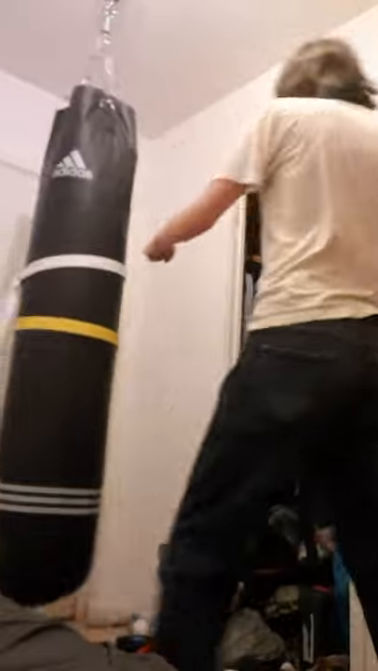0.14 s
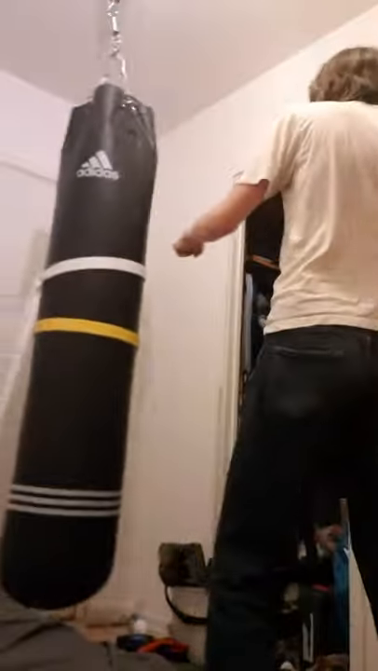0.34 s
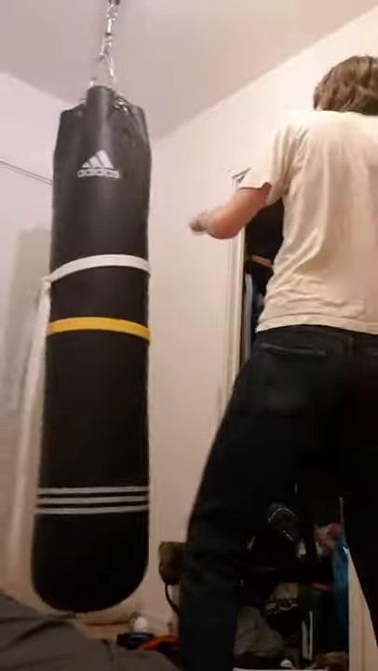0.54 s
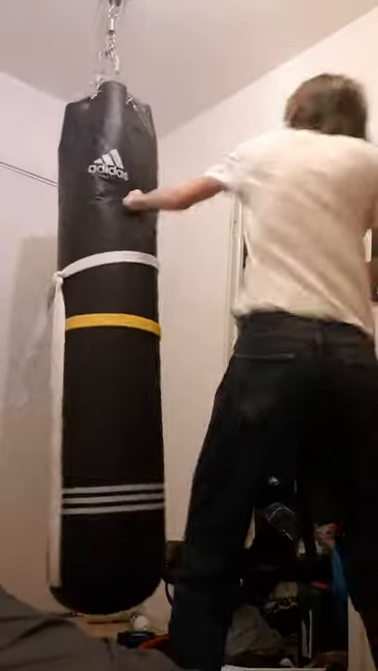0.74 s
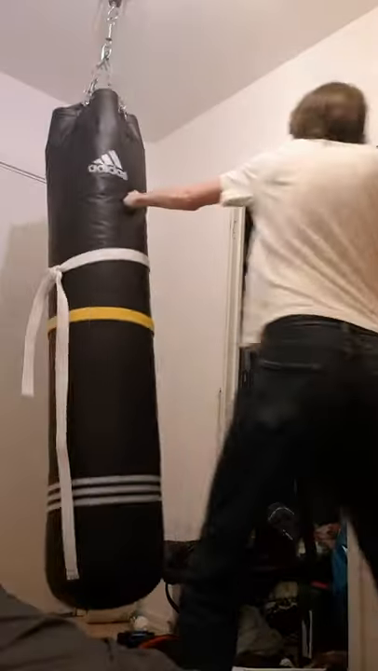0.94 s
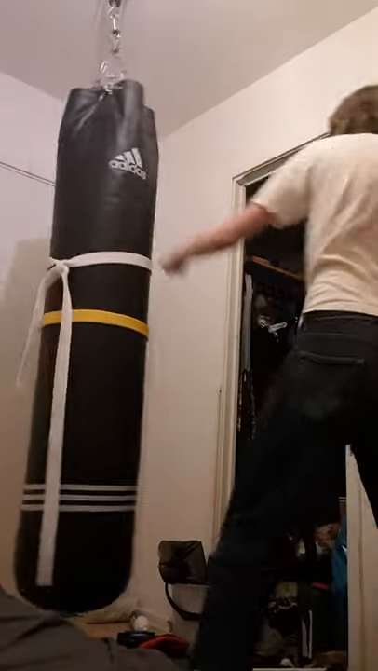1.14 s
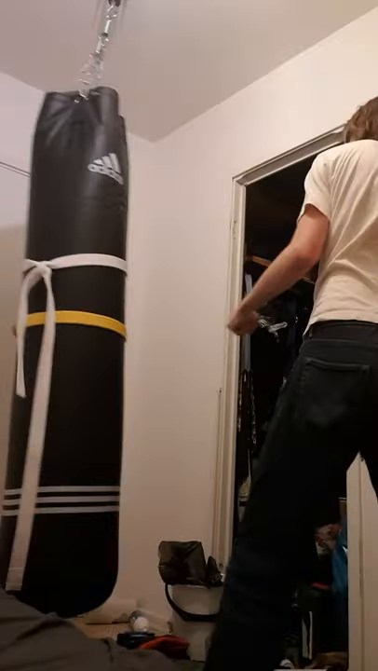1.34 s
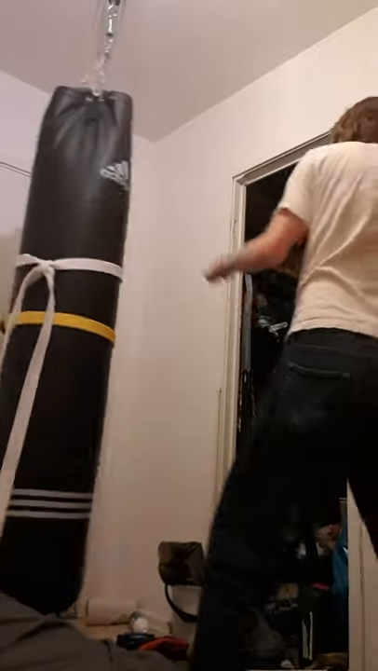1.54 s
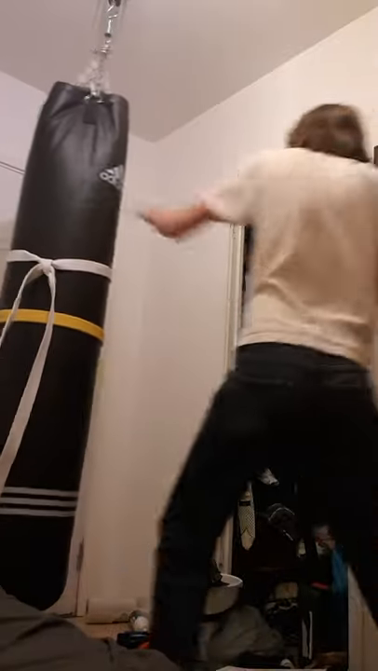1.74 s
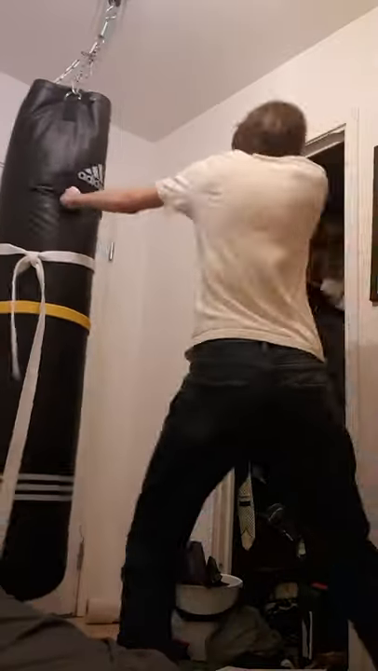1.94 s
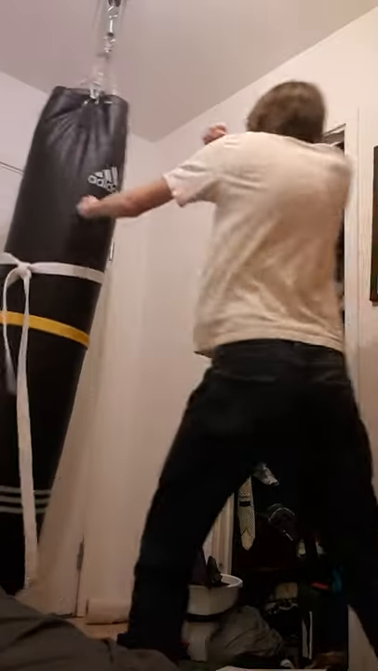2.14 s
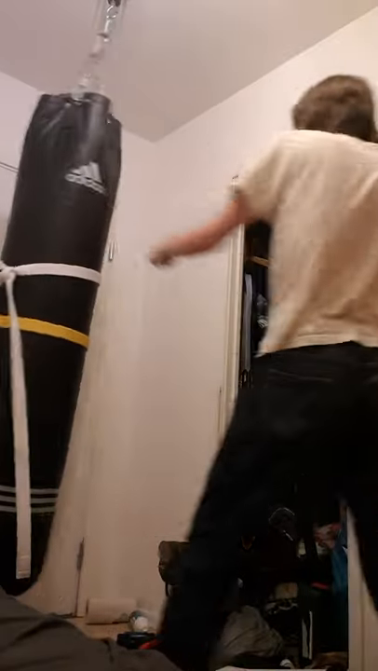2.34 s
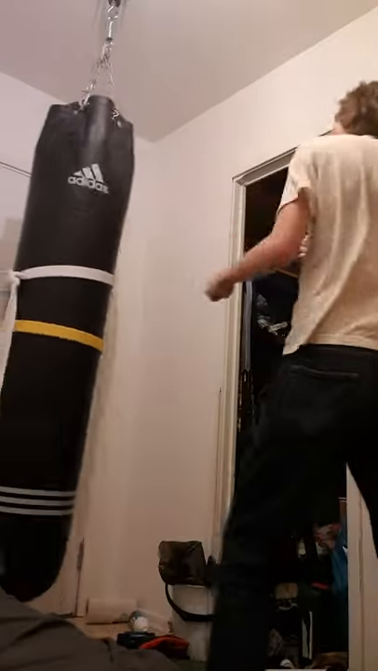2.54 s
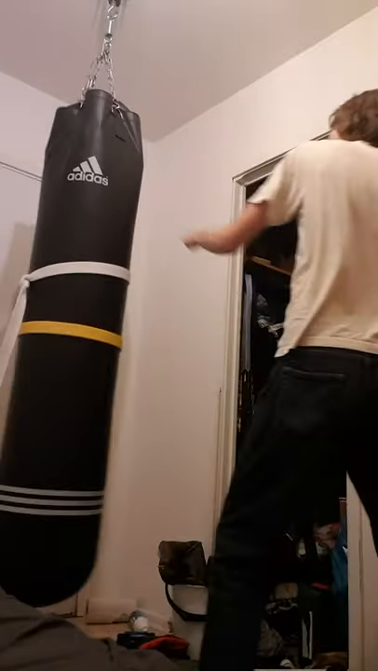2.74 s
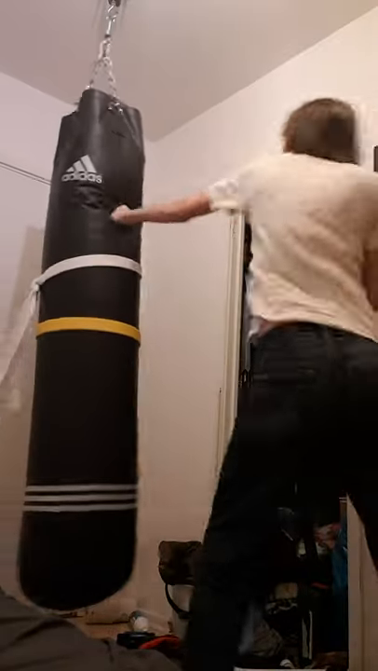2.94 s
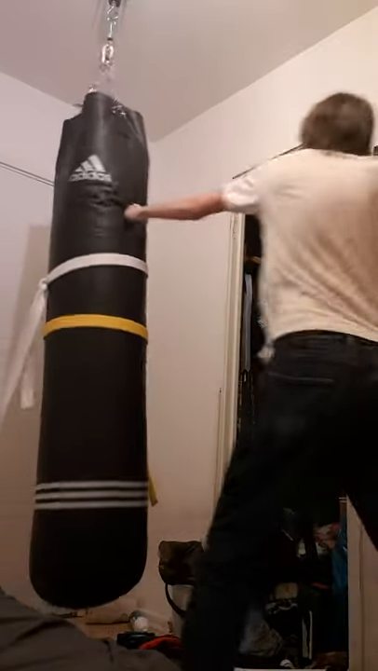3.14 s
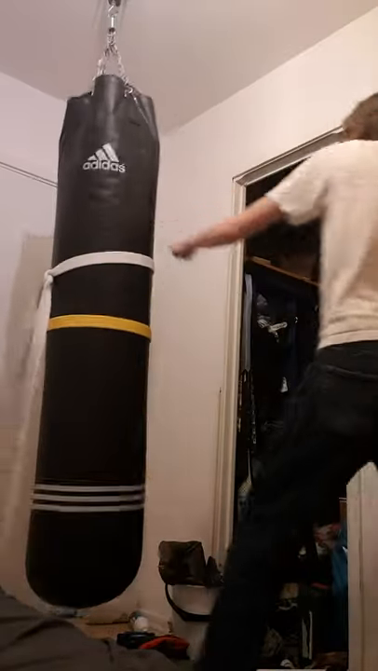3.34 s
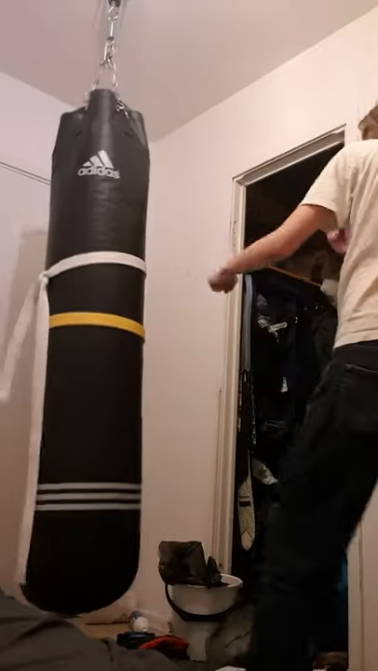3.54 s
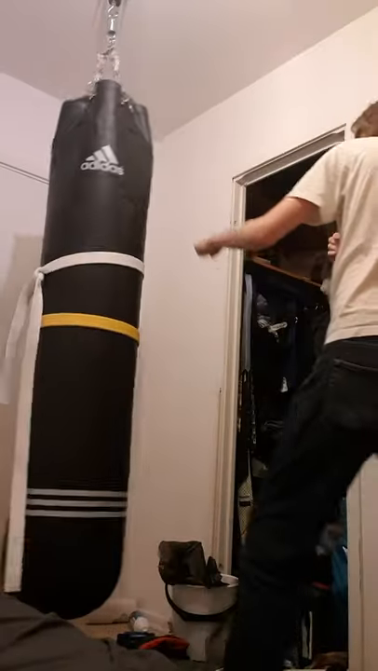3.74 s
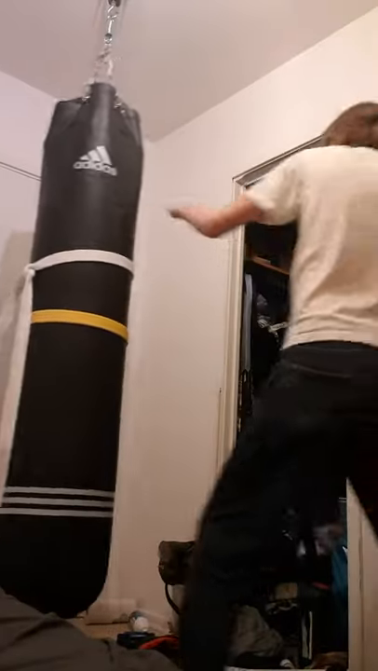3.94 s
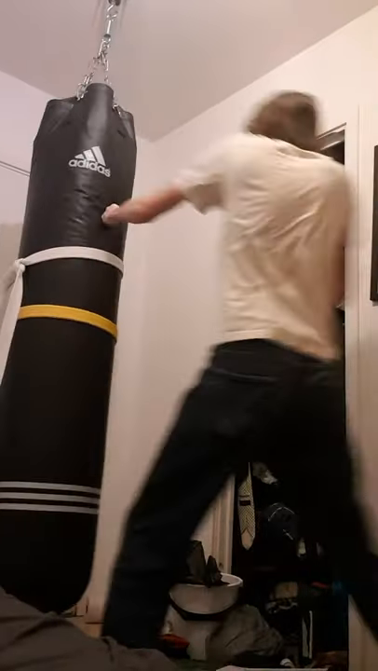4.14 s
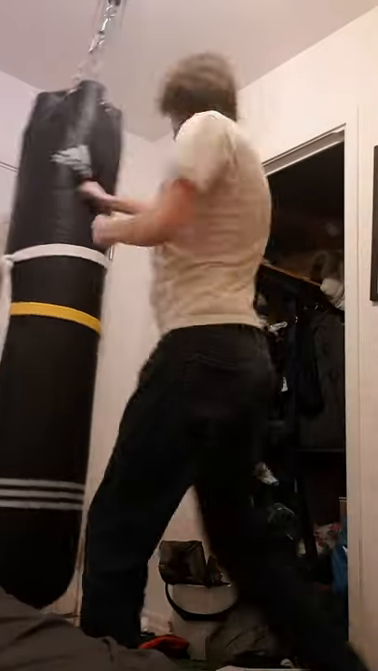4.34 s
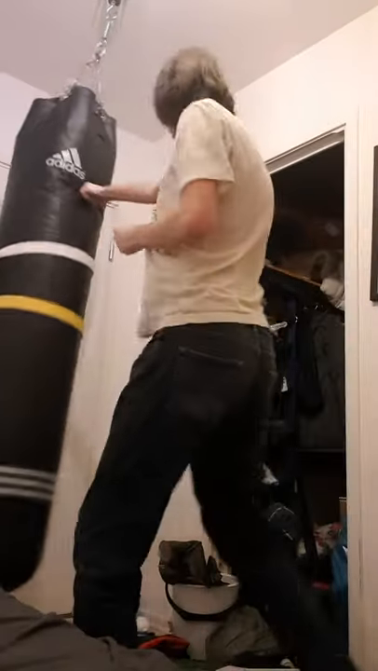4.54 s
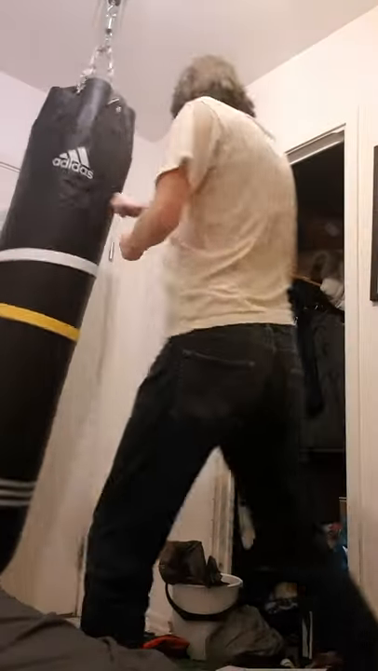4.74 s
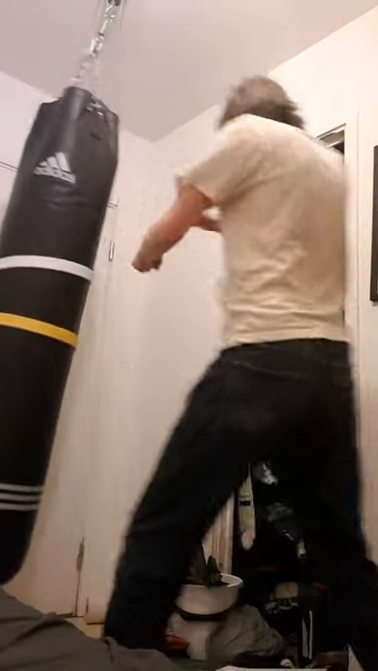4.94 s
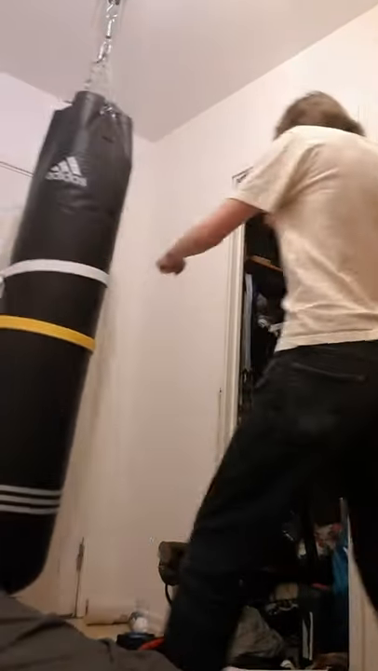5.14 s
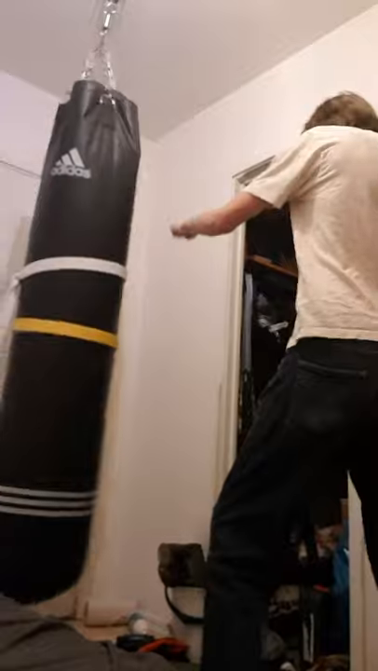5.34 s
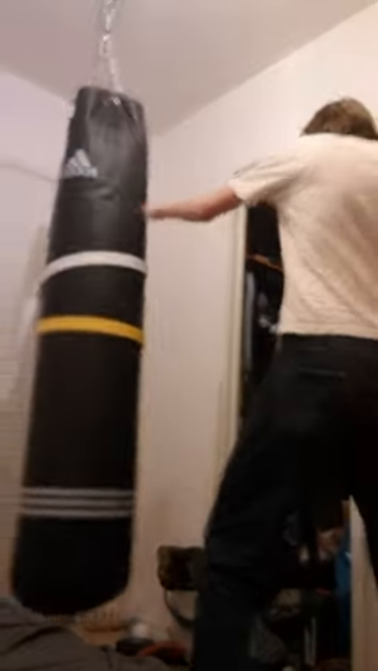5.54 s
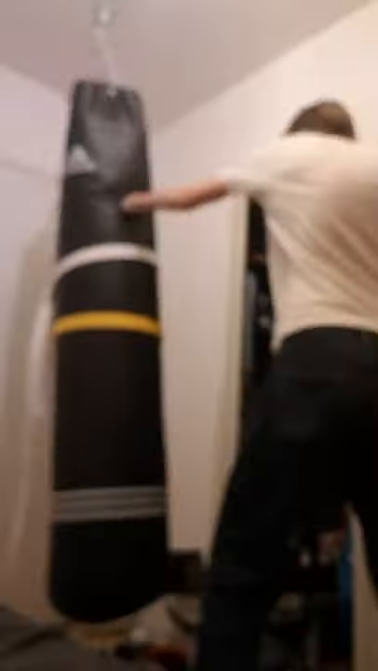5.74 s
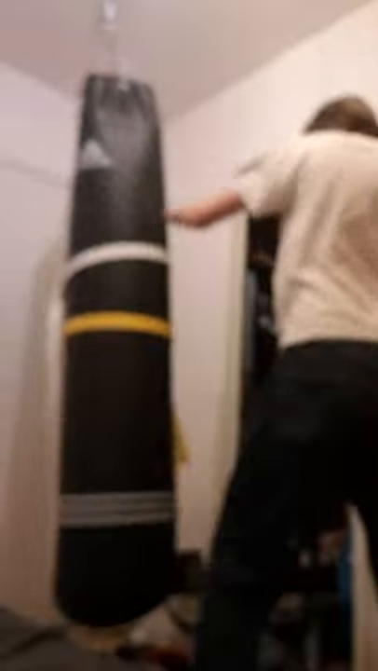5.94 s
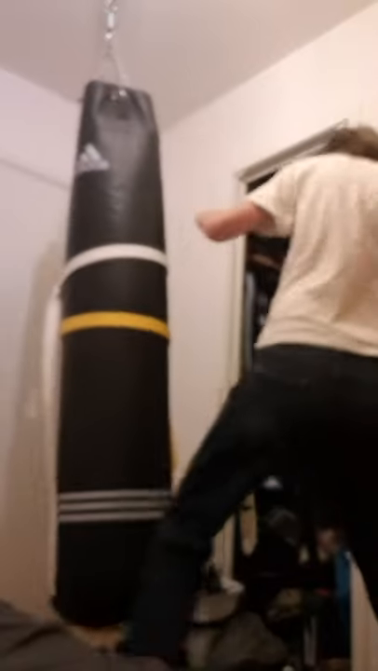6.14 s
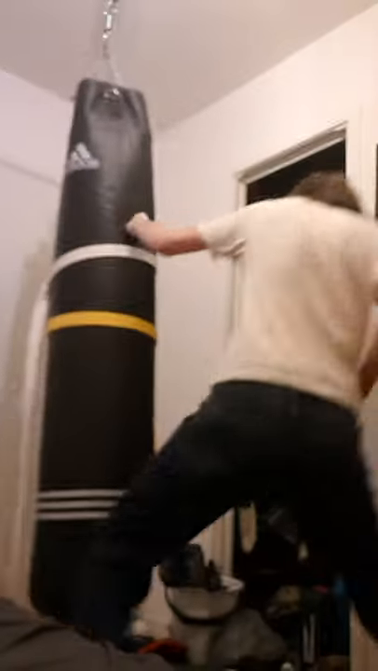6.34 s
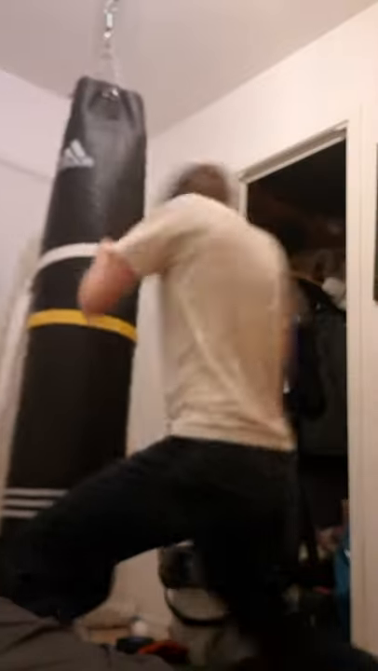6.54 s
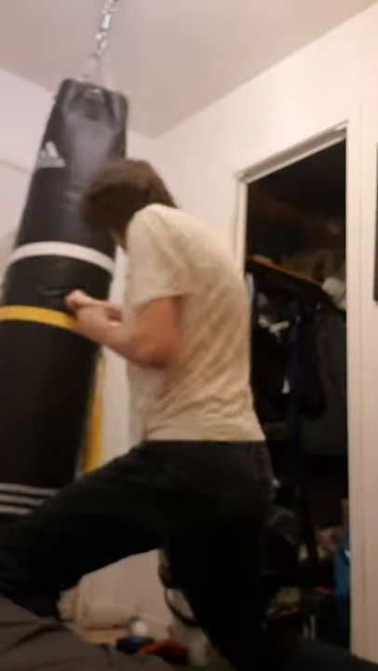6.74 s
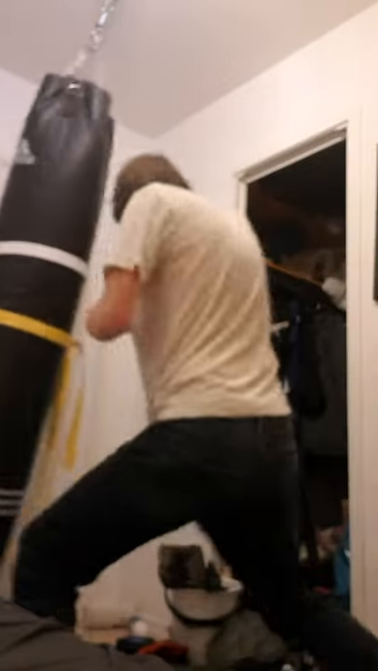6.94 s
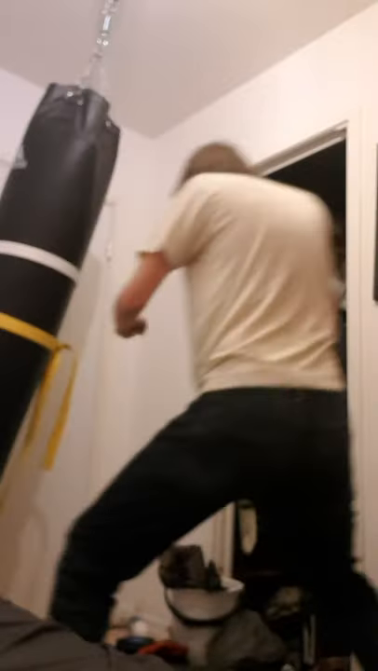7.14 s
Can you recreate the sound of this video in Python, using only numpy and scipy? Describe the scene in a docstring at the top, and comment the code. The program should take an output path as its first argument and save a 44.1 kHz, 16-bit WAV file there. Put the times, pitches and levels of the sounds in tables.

```python
"""Low noise and a creak come first, then a dull thump and the clink of a loose chain; fists soon hit a heavy bag.
Links are made of short noise bursts, ringing tones and tiny random contacts as the bag sways.
Punches are an inward pulse plus a noisy slap; thumps are soft noise, and both set low room tones booming.
Fading echoes make the small room, and a pair of microphones hears it, the right one shaded and duller."""
import sys
import numpy as np
from scipy import signal
from scipy.fft import rfft, irfft
from scipy.io import wavfile
from scipy.ndimage import uniform_filter1d

SR = 44100
rng = np.random.default_rng(int(sys.argv[2]) if len(sys.argv) > 2 else 0)


def dump(signal):
    """Clip the signal to [-1, 1] and save it as 16-bit WAV at the path in sys.argv[1]."""
    limited = np.clip(np.atleast_2d(signal).T, -1, 1)
    pcm = np.round(limited * 32767).astype(np.int16)
    wavfile.write(sys.argv[1], SR, pcm)


N = 316638

# All source levels in these tables are relative: each sound adds its own offset.
# steady background noise: [pitch_hz, level_db]
FLOOR_NOISE = [(15, -35), (25, -46), (78, 32.5), (170, -13), (229, 3), (545, -33), (1190, 7.5),
               (2410, -5.5), (4250, -13), (8830, -13), (10400, -80), (14400, -69), (16000, -39)]
# how hard the bag sways: [start_s, creak_db, chain_rattle_db]
SWAY = [(0.0, -40, -47), (0.12, -47, -46), (0.6, -55, -54.5), (0.8, -57.5, -57), (0.98, -40, -48),
        (1.26, -49.5, -56.5), (1.4, -52, -66), (1.62, -52, -51), (2.16, -53.5, -55), (2.58, -50, -46.5),
        (2.82, -55.5, -85), (3.02, -56, -50), (3.14, -47, -48), (3.54, -47.5, -51), (3.94, -56.5, -71),
        (4.14, -48, -55), (4.3, -52.5, -55.5), (4.56, -50.5, -60), (4.86, -46, -39.5), (5.22, -49.5, -58),
        (5.76, -53, -58), (6.06, -54, -55), (6.64, -55.5, -59), (7.18, -54, -54)]
# low tones of room and ceiling: [pitch_hz, level_db, time_to_fall_60_db_s]
BOOM_MODES = [(28.7, -56, 0.15), (52.1, -3.5, 0.6), (80.1, -2.5, 0.39), (93.1, -9.5, 0.34), (99, -7, 0.2)]
# thumps of feet and ceiling mount: [start_s, boom_db, knock_db, boom_tilt_db_per_octave]
THUMPS = [(0.02, -47, -33.5, 3), (0.13, -30.5, -40, 5.5), (0.206, -29.5, -27.5, -2),
          (0.498, -56, -42.5, -4), (0.849, -31, -37.5, 1), (0.934, -21.5, -36, 1), (0.984, -23.5, -38, -1),
          (1.037, -25, -39, -1), (1.068, -23, -32.5, -10), (1.166, -30.5, -36, 4), (1.246, -30, -39.5, -1),
          (1.376, -38, -43, 8), (1.659, -37, -40.5, 10), (1.988, -31, -43, -5), (2.126, -46, -41, -1),
          (2.248, -31, -37, 7), (2.286, -45, -43.5, -1), (2.412, -46, -40, 3), (2.458, -48, -38.5, 0),
          (2.511, -23, -37.5, -5), (2.574, -36, -45, 4), (2.682, -28, -39.5, 1), (2.743, -46, -45, 3),
          (3.288, -42, -39.5, 3), (3.384, -24, -39.5, -2), (3.447, -40, -33.5, -3), (3.499, -31, -37, -1),
          (3.77, -39, -40, -4), (4.025, -34, -41, -1), (4.169, -34, -38.5, 2), (4.522, -33, -39.5, 7),
          (4.7, -37, -43.5, 3), (4.792, -27.5, -37.5, 6.5), (4.894, -29.5, -33, 8), (5.209, -45, -43.5, 5),
          (5.51, -34, -41, 3), (5.929, -49, -43.5, 11), (6.208, -48, -44.5, 1), (6.297, -43, -48.5, 3),
          (6.513, -40.5, -43.5, 7), (7.008, -61, -44.5, 3)]
# chain clinks: [start_s, clank_db, clank_hz, tinkle_minus_clank_db, low_scrape_minus_clank_db]
CLINKS = [(0.0308, -42, 4230, 0.5, -4), (0.14, -45.5, 2800, -1.5, -15), (0.167, -31.5, 4330, -17, -27),
          (0.2088, -20, 4450, -12.5, -18), (0.5564, -28, 4270, -21, -19.5), (0.8865, -26.5, 4200, -8, -29),
          (0.9444, -47, 4400, 3, -17), (0.9672, -33, 4300, -8, -26), (1.012, -33, 2820, -4.5, -2.5),
          (1.045, -30, 4470, -3, -22), (1.074, -52, 3700, 8, -8), (1.1284, -42, 4950, 5, -4.5),
          (1.1982, -34, 4600, -12, -12), (1.241, -34.5, 3350, -5, -15), (1.3362, -38.5, 4340, -8, -2),
          (1.3784, -41.5, 2920, -4.5, 1), (1.5948, -39.5, 4670, -1.5, -2), (1.7997, -67, 4960, -23, -17),
          (1.935, -23.5, 3860, -16, -10.5), (1.9764, -43, 3770, -10, -11), (2.0044, -34, 3930, -10, -12),
          (2.1293, -46, 3700, -12, -20.5), (2.146, -34, 4130, -15.5, -15), (2.1996, -39, 4400, 1.5, -5.5),
          (2.253, -51, 3850, 3, -11), (2.2967, -28.5, 3030, -6, -13.5), (2.3176, -34, 3180, -10, -14),
          (2.4503, -38.5, 4300, -8, -6), (2.5145, -51, 4250, -3, -12), (2.547, -40, 2940, -9, -10),
          (2.5986, -42, 3760, -4.5, -12), (2.6857, -48, 4930, -0.5, -16), (2.7511, -44, 4350, 0.5, -6),
          (2.798, -47, 3430, -30, -13), (3.0853, -30.5, 4350, -8, -10), (3.1464, -57, 4260, -11, -14),
          (3.2224, -43, 3900, -1, -7), (3.3053, -28.5, 4570, -13, -19), (3.348, -35.5, 4160, 2, -5),
          (3.4158, -37.5, 4370, -2, -8), (3.4525, -23, 3260, -19, -17), (3.5078, -27, 4430, -13.5, -16),
          (3.5913, -42, 3360, -5, -6), (3.681, -43, 3920, -3.5, -12), (3.7702, -37, 3770, -9, -10),
          (3.8383, -35.5, 3540, -9, -10), (4.4649, -26, 4400, -15, -22), (4.5547, -34, 4100, -9, -19),
          (4.5912, -35.5, 2710, -4.5, -6.5), (4.6106, -28.5, 4240, -10, -14.5),
          (4.7368, -34, 4080, -0.5, -10), (4.804, -33.5, 4850, -4, -13), (4.8453, -34.5, 3430, -8, -25),
          (4.9132, -37, 3460, 4, -2), (4.9878, -40, 4240, -18, -0.5), (5.0575, -46, 4970, 1.5, -1),
          (5.154, -38.5, 3690, -8.5, -20), (5.253, -49, 3050, -2, -8), (5.288, -43.5, 3200, -5, 0),
          (5.3523, -45, 4080, 4, -6), (5.3658, -39, 5130, -15, -9.5), (5.4304, -41.5, 4330, -5, -21),
          (5.447, -43, 4500, -9, -22), (5.5798, -35.5, 4240, -21, -21), (5.69, -32.5, 4470, -7, -8.5),
          (5.855, -48.5, 4530, -8, -21), (5.8895, -50, 4270, -25, -27), (5.924, -39.5, 3040, -29, 0),
          (5.9987, -41, 4580, -16, -5), (6.062, -47, 4170, 2, -15), (6.1795, -46, 4400, -9.5, -3.5),
          (6.2731, -46.5, 4570, -24, -20), (6.4124, -39.5, 4400, -5.5, -13), (6.5194, -55.5, 3340, 0, 6),
          (6.7948, -37.5, 3400, -3, -2), (7.0034, -29.5, 3750, -12, -14)]
# ringing tones shared by the links: [pitch_hz, width_hz, level_db]
LINK_MODES = [(3350, 66, -1), (4560, 170, -14.5), (6700, 33, -12), (10170, 190, 8.5), (11580, 170, 6.5),
              (13600, 88, 7), (14000, 160, -18.5), (14700, 98, 3)]
# moments when one link rings out: [start_s, link_name, level_db]
LINK_NOTES = [(.14, "m", -50), (.557, "h", -47.5), (.558, "k", -50), (.559, "d", -42), (.883, "i", -39),
              (.884, "l", -35), (.887, "g", -38), (.97, "g", -50), (1.048, "j", -38.5), (1.129, "m", -52),
              (1.198, "d", -54), (1.207, "h", -47), (1.379, "i", -46), (1.599, "g", -46), (1.605, "l", -45),
              (1.933, "a", -37), (1.933, "k", -42), (2.005, "j", -39), (2.2, "m", -47), (2.3, "e", -36.5),
              (2.318, "i", -36), (2.448, "d", -54), (2.579, "f", -47), (3.093, "g", -42), (3.147, "g", -48),
              (3.305, "d", -50), (3.315, "g", -38), (3.32, "n", -49), (3.345, "i", -36),
              (3.434, "h", -39.5), (3.469, "a", -40.5), (3.512, "k", -44), (3.518, "n", -49),
              (3.591, "i", -41), (3.619, "g", -45.5), (3.782, "k", -52), (3.837, "l", -44),
              (3.844, "e", -43), (4.36, "i", -37), (4.463, "l", -36), (4.464, "f", -38), (4.467, "i", -37),
              (4.469, "g", -38), (4.608, "i", -33.5), (4.642, "d", -62), (4.74, "h", -39),
              (4.743, "l", -39), (4.852, "g", -44), (4.908, "l", -39), (4.923, "g", -41), (5.016, "c", -43),
              (5.257, "g", -44.5), (5.286, "i", -47), (5.368, "e", -38.5), (5.369, "g", -41.5),
              (5.372, "i", -46), (5.69, "k", -46), (5.702, "n", -49), (5.923, "a", -45), (6.002, "k", -60),
              (6.777, "b", -49), (6.793, "c", -51), (6.794, "k", -48), (6.815, "f", -49)]
# links with a clear tone of their own, by link_name: [middle_pitch_hz, time_to_fall_60_db_s]
LINK_TONES = {"a": (1700, .2), "b": (3560, .23), "c": (5780, .22), "d": (6560, .26), "e": (7600, .14),
              "f": (8750, .18), "g": (10140, .27), "h": (10290, .28), "i": (11590, .18), "j": (11800, .17),
              "k": (12890, .26), "l": (13980, .2), "m": (14680, .25), "n": (15720, .26)}
# punches: [start_s, knuckle_pulse_db, boom_db, boom_tilt_db_per_octave, body_db,
#           cover_slap_db, slap_delay_s, sizzle_db]
PUNCHES = [(0.7640, -14, -21, 1, -32, -24, 0.0035, -21),
           (1.8493, -23.5, -36.5, 15.5, -36, -35, 0.0014, -27.5),
           (2.95750, -19.5, -29, 0.5, -36, -22, 0.00097, -24),
           (4.1288, -20.5, -31, 5, -33, -27.5, 0.0029, -33),
           (4.345, -7.5, -13.5, -7, -21.5, -16.5, 0.003, -12.5),
           (5.6670, -26.5, -45.5, 13, -50, -44, 0.0016, -55),
           (6.378, -24.5, -36.5, 9.5, -40.5, -36.5, 0.0053, -35),
           (6.6585, -8.5, -14.5, -5, -24, -16, 0.0012, -19)]
# tones of bag and walls: [pitch_hz, level_db, time_to_fall_60_db_s]
BODY_MODES = [(158.5, 6.5, 0.11), (150, -7.5, 0.23), (207, 1.5, 0.26), (227, 1, 0.24), (267, -32, 0.33),
              (299.5, -4.5, 0.46), (342, -13, 0.1), (399, -8, 0.35), (440, -34, 0.26)]
# how long echoes last: [pitch_hz, time_to_fall_60_db_s]
ECHO_TIMES = [(100, 0.56), (300, 0.27), (800, 0.27), (2000, 0.32), (5000, 0.23), (13000, 0.29)]
# how alike left and right are: [pitch_hz, likeness_0_to_1]
LIKENESS = [(100, 1), (300, 1), (600, 0.85), (1200, 0.35), (4000, 0.017), (13000, 0.035)]
# shading of the right microphone: [pitch_hz, left_minus_right_db]
SHADE = [(60, -2), (110, 6), (200, 2), (380, 2), (700, 0.5), (1290, 6), (2380, 9), (4400, 7), (8120, 22),
         (15000, 6.5)]
# colour of the microphones: [pitch_hz, level_db]
MIC_COLOUR = [(100, 0.5), (300, 2), (700, -1.5), (1300, -6.5), (2500, -1.5), (4300, 7), (6500, -4.5),
              (8500, -11.5), (12000, -5.5), (15500, 0.5)]

FLOOR_DB, RUMBLE_MINUS_CREAK_DB = -59.0, -1
CLOSE_KNOCK_DB = -10.5  # thumps also come straight through the floor
DIP_DELAY_S, BOOM_DELAY_S, BODY_DELAY_S = 0.009, 0.0035, 0.0085
AFTER_DB, AFTER_T60_S = -4.5, 0.22  # small touches after each clink, against its tinkle
JOLT_DB, JOLT_T60_S = -9.5, 0.32  # each punch shakes the whole chain, against its slap
MIDDLE_DB, MIDDLE_SHARE = -2, 0.59  # the band between clank and tinkle leans to the tinkle
RIGHT_LAG_SAMPLES, CUTOFF_HZ = 12, 15880


def amp(db):
    """Turn decibels into a multiplier."""
    return 10 ** (np.asarray(db) / 20)


def rms_one(x):
    """Scale a sound to an average strength (rms) of one."""
    return x / np.sqrt(np.mean(x ** 2) + 1e-20)


def at_hz(points, hz):
    """Read a table between its points, with pitch on a log scale."""
    pitches, values = np.array(points)[:, 0], np.array(points)[:, 1]
    return np.interp(np.log(hz), np.log(pitches), values)


def clicks(times, gains):
    """Put a one-sample click at each moment."""
    out = np.full(N, 1e-18)
    places = np.minimum((np.asarray(times) * SR).astype(int), N - 1)
    np.add.at(out, places, gains)
    return out


def band(x, low_hz, high_hz):
    """Keep mainly the sound between two pitches."""
    return signal.sosfilt(signal.butter(2, [low_hz, high_hz], "band", fs=SR, output="sos"), x)


def ring(x, hz, t60):
    """Let each click set a sine of height 1 ringing, which falls 60 dB in t60 seconds."""
    radius = amp(-60 / (max(t60, 0.002) * SR))
    angle = 2 * np.pi * hz / SR
    return signal.lfilter([0, np.sin(angle)], [1, -2 * radius * np.cos(angle), radius ** 2], x)


def struck(modes, times, level_db, tilt_db, contact_s):
    """Each blow sets every tone ringing, with uneven force; a long soft contact starts them slowly."""
    chance_db = rng.normal(0, 1.5, (len(times), len(modes)))
    rings = 0
    for k, (hz, mode_db, t60) in enumerate(modes):
        octaves_up = np.log2(hz / modes[1][0])  # counted from the second tone
        blow_db = level_db + mode_db + tilt_db * octaves_up + chance_db[:, k]
        rings = rings + ring(clicks(times, amp(blow_db)), hz, t60)
    contact = np.hanning(int(contact_s * SR) + 3)
    return signal.fftconvolve(rings, contact / contact.sum())[:N]


def fades(times, level_db, t60):
    """Strength that jumps at each moment and then dies away."""
    return signal.lfilter([1], [1, -amp(-60 / (t60 * SR))], clicks(times, amp(level_db)))


def burst(times, level_db, t60, rise_s=0.0001):
    """Puffs of white noise that swell and die fast."""
    keep = np.exp(-1 / (rise_s * SR))
    envelope = signal.lfilter([1 - keep], [1, -keep], fades(times, level_db, t60))
    return envelope * rng.standard_normal(N)


def grains(per_s, spread_db):
    """Random tiny contacts of uneven size, with an rms of one."""
    sizes = amp(spread_db * np.minimum(rng.exponential(1, N), 4))
    sizes = sizes * rng.choice([-1, 1], N)
    return rms_one(sizes * (rng.random(N) < per_s / SR))


def stereo_bands(size, shape):
    """Half-octave bands of stereo noise; deep bands are shared by both ears, high ones differ."""
    out, edges = 0, 22 * 2 ** np.arange(0, 9.9, 0.5)
    white = rng.standard_normal((2, 2, size))
    for k, (low_hz, high_hz) in enumerate(zip(edges, edges[1:])):
        mid, side = band(white[k % 2], low_hz, high_hz)
        hz = np.sqrt(low_hz * high_hz)
        alike = at_hz(LIKENESS, hz)
        pair = np.sqrt(1 + alike) * mid + np.sqrt(1 - alike) * side * [[1], [-1]]
        out = out + shape(hz) * pair
    return out


def room(x, direct_db, build_s, evenness):
    """Direct sound plus dense echoes that build up, then die at a different speed in each band."""
    t = np.arange(SR // 2) / SR
    echoes = stereo_bands(len(t), lambda hz: amp(-60 * t / at_hz(ECHO_TIMES, hz)))
    spectrum = rfft(echoes * (1 - np.exp(-t / build_s)))
    # partly level the peaks and dips of the echo noise, for a smoother room sound
    height = np.abs(spectrum) + 1e-9
    spectrum *= (uniform_filter1d(height, size=101) / height) ** evenness
    echoes = irfft(spectrum)[:, :SR // 3]
    echoes /= np.sqrt(np.sum(echoes ** 2) / 2)
    echoes[:, 0] = amp(direct_db)
    return signal.fftconvolve(x[None], echoes, axes=1)[:, :N]


def background():
    """Steady stereo noise, with its strength set band by band."""
    noise = stereo_bands(N, lambda hz: amp(at_hz(FLOOR_NOISE, hz)))
    return amp(FLOOR_DB) * rms_one(noise)


def creak(creak_db):
    """Many tiny contacts creak as the bag sways."""
    return amp(creak_db) * rms_one(band(grains(per_s=96, spread_db=3.5), 130, 870))


def mount_rumble(creak_db):
    """Random shaking of the mount keeps the low room tones going, here with longer ringing."""
    shaking = grains(per_s=22, spread_db=2)
    tones = sum(amp(db) * ring(shaking, hz, t60 * 1.75) for hz, db, t60 in BOOM_MODES)
    return amp(creak_db + RUMBLE_MINUS_CREAK_DB) * rms_one(tones)


def thumps():
    """Dull knocks through floor and ceiling; the boards dip first and the boom follows."""
    s, boom_db, knock_db, tilt_db = np.transpose(THUMPS)
    knock = band(burst(s + 0.00522, knock_db + 29.5, t60=0.019, rise_s=0.0035), 82, 852)
    # the minus sign makes the boards dip first
    boom = -struck(BOOM_MODES, s + DIP_DELAY_S, boom_db - 7, tilt_db, contact_s=0.0027)
    return knock, boom


def small_touches(rattle_db, s, tinkle_db):
    """Tiny link contacts that follow the sway, trail each clink and flare up with each punch."""
    after = fades(s, tinkle_db + AFTER_DB, AFTER_T60_S)
    hit_s, *_, slap_db, _, _ = np.transpose(PUNCHES)
    jolt = fades(hit_s, slap_db + JOLT_DB, JOLT_T60_S)
    return (amp(rattle_db) + after + jolt) * grains(per_s=200, spread_db=4.0)


def steel_scrapes(s, low_db, clank_db, middle_db, tinkle_db):
    """Steel scrapes on steel: short noise bursts in four bands, from low scrape to tinkle."""
    out = band(burst(s, low_db + 20.5, t60=0.049, rise_s=0.0028), 590, 1840)
    out += band(burst(s, clank_db + 1.5, t60=0.015, rise_s=0.00033), 2600, 5780)
    out += band(burst(s, middle_db + 14.5, t60=0.019, rise_s=0.0029), 5800, 9600)
    out += band(burst(s, tinkle_db + 13.5, t60=0.045, rise_s=0.0026), 10200, 13100)
    return out


def link_ringing(s, clank_db, tinkle_db, touches):
    """Knocks and small touches set the shared tones of the links ringing; wide tones die sooner."""
    out = np.zeros(N)
    chance_db = rng.normal(0, 4, (len(s), len(LINK_MODES)))
    for k, (hz, width_hz, db) in enumerate(LINK_MODES):
        level_db = clank_db - 13.5 if hz < 5500 else tinkle_db - 2
        blows = clicks(s, amp(level_db + db + chance_db[:, k])) + amp(db - 46) * touches
        out += ring(blows, hz, t60=np.log(1000) / (np.pi * width_hz))
    return out


def rubbed_shackle(s, clank_db, clank_hz):
    """Fading noise rubs the damped shackle, which answers briefly at the clank pitch."""
    out, t = np.zeros(N), np.arange(SR // 4) / SR
    rub = rng.standard_normal((len(s), len(t))) * amp(-60 * t / 0.03)
    for k, at in enumerate((s * SR).astype(int)):
        clank = amp(clank_db[k] - 16.5) * ring(rub[k], clank_hz[k], t60=0.0077)
        out[at:at + len(t)] += clank[:N - at]
    return out


def chain(rattle_db):
    """Links knock with a short scrape, their tones ring, and small touches fill in."""
    s, clank_db, clank_hz, bright_db, dull_db = np.transpose(CLINKS)
    low_db, tinkle_db = clank_db + dull_db, clank_db + bright_db
    middle_db = clank_db + MIDDLE_DB + MIDDLE_SHARE * bright_db
    touches = small_touches(rattle_db, s, tinkle_db)
    out = steel_scrapes(s, low_db, clank_db, middle_db, tinkle_db)
    out += amp(-6.0) * band(touches, 570, 12200)
    out += link_ringing(s, clank_db, tinkle_db, touches)
    return out + rubbed_shackle(s, clank_db, clank_hz)


def link_notes(split_hz, rise_s):
    """Each link rings with one tone, which wavers in the room differently at each microphone."""
    out, t = np.zeros((2, N)), np.arange(SR // 3) / SR
    # four close sines make the waver; axes: note, pitch or phase, microphone, sine, time
    chance = rng.uniform(-0.88, 1, (len(LINK_NOTES), 2, 2, 4, 1))
    for (s, link, db), (split, phase) in zip(LINK_NOTES, chance):
        hz, t60 = LINK_TONES[link]
        sines = np.sin(2 * np.pi * (hz + split_hz * split) * t + np.pi * phase)
        wavering_tone = sines.sum(axis=1)
        envelope = amp(db - 60 * t / t60) * (1 - np.exp(-t / rise_s))
        at = int(s * SR)
        out[:, at:at + len(t)] += (envelope * wavering_tone)[:, :N - at]
    return out


def punches():
    """Knuckles push in, the cover slaps, the shoved bag sounds and the room booms."""
    s, pulse_db, boom_db, tilt_db, body_db, slap_db, delay_s, sizzle_db = np.transpose(PUNCHES)
    # knuckles on padding: under a millisecond
    pulse = -np.convolve(clicks(s, amp(pulse_db + 11)), np.hanning(30))[:N]
    first_touch = burst(s, slap_db + 3, t60=0.016)
    flat_slap = burst(s + delay_s, slap_db + 15.5, t60=0.0044)
    slap = band(band(first_touch + flat_slap, 1600, 7100), 950, 7400)
    sizzle = band(burst(s + delay_s, sizzle_db, t60=0.022), 10700, 13400)
    boom = struck(BOOM_MODES, s + BOOM_DELAY_S, boom_db + 2, tilt_db, contact_s=0.0063)
    body = struck(BODY_MODES, s + BODY_DELAY_S, body_db - 0.5, 0, contact_s=0.00075)
    return pulse + slap + sizzle, boom + body


def scene():
    """Bring all sources together in the room, over steady noise."""
    s, *columns = np.transpose(SWAY)
    creak_db, rattle_db = [np.interp(np.arange(N) / SR, s, column) for column in columns]
    knock, thump_boom = thumps()
    hit, punch_boom = punches()
    near_sources = hit + knock + creak(creak_db)
    near = room(near_sources, direct_db=-4, build_s=0.00056, evenness=0.57)
    near += amp(CLOSE_KNOCK_DB) * knock
    # the chain hangs far up, in a corner of echoes
    overhead = room(chain(rattle_db), direct_db=-5.0, build_s=0.002, evenness=0.77)
    ringing = link_notes(split_hz=89, rise_s=0.00063)
    low_sounds = punch_boom + thump_boom + mount_rumble(creak_db)
    return near + overhead + ringing + low_sounds + background()


def record(dry):
    """Colour both microphones, shade and delay the right one, round the peaks and cut the top."""
    grid = np.linspace(0, 1, 257)
    hz = np.linspace(1, SR / 2, 257)
    heard = []
    for x, side in zip(dry, (0.5, -0.5)):
        gain = amp(at_hz(MIC_COLOUR, hz) + side * at_hz(SHADE, hz))
        # squared because minimum_phase takes the square root of the gain
        port = signal.minimum_phase(signal.firwin2(511, grid, gain ** 2))
        heard.append(signal.lfilter(port, 1, x))
    left, right = heard
    pair = np.array([left, np.pad(right, (RIGHT_LAG_SAMPLES, 0))[:N]])
    pair /= (1 + (pair / 0.96) ** 6) ** (1 / 6)  # round the peaks
    return signal.sosfilt(signal.ellip(14, 0.5, 90, CUTOFF_HZ, fs=SR, output="sos"), pair)


dry = scene()
out = record(dry)
dump(out)
```